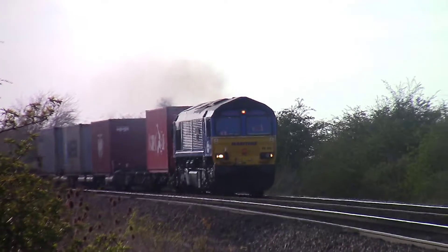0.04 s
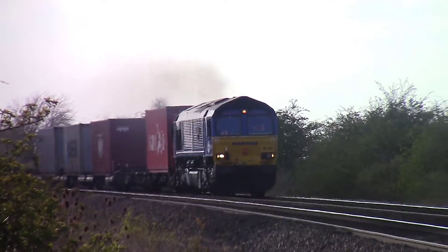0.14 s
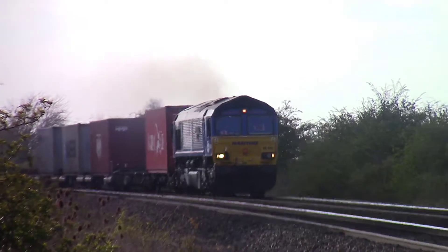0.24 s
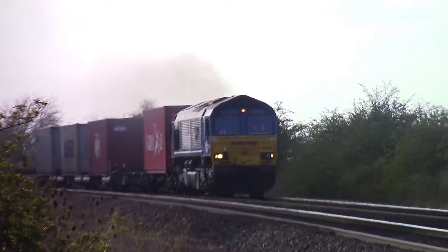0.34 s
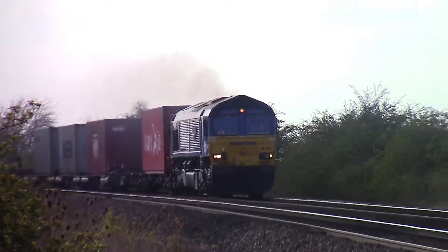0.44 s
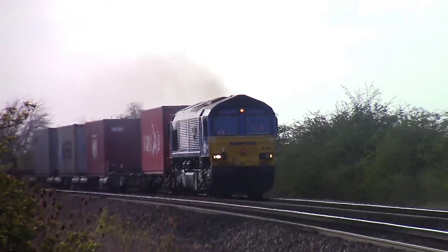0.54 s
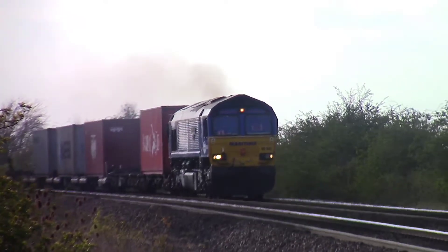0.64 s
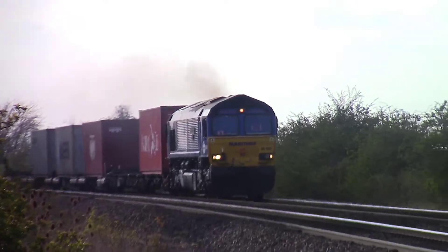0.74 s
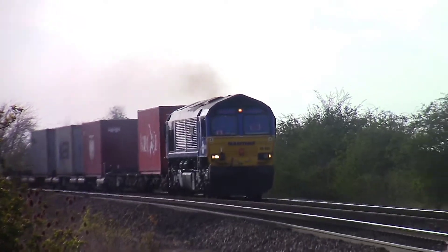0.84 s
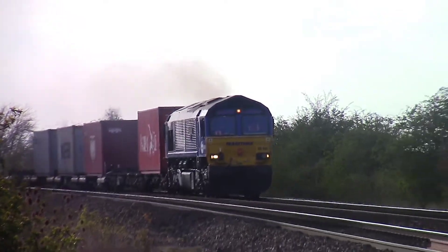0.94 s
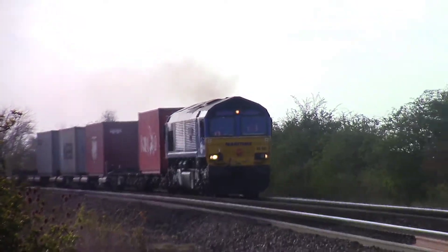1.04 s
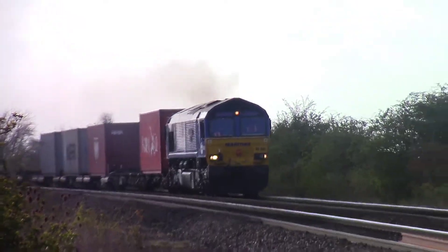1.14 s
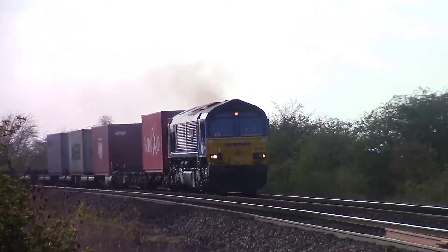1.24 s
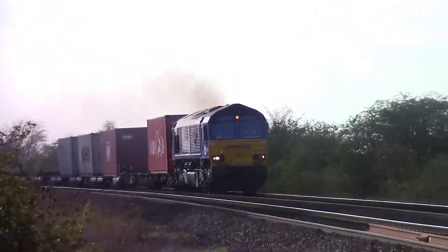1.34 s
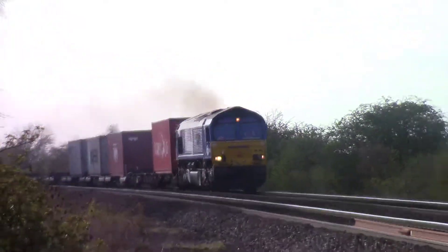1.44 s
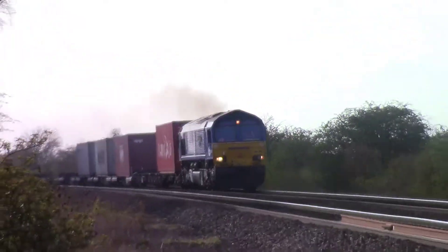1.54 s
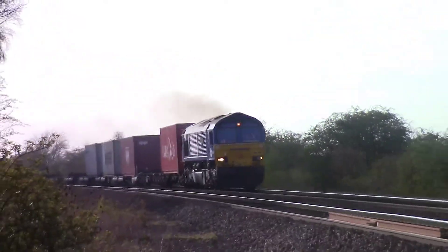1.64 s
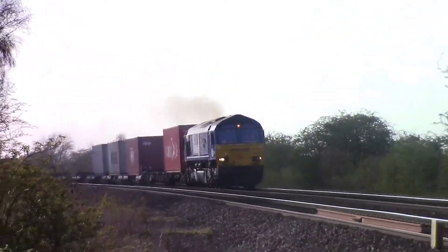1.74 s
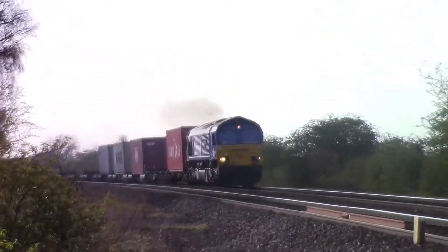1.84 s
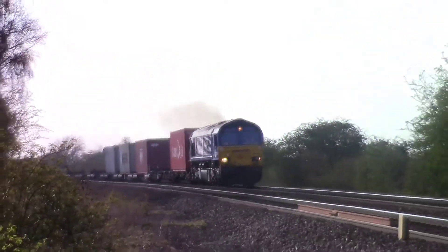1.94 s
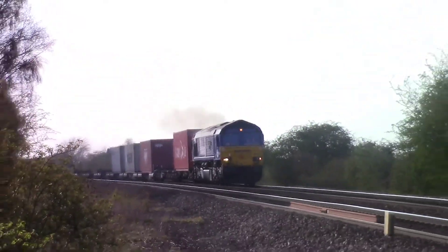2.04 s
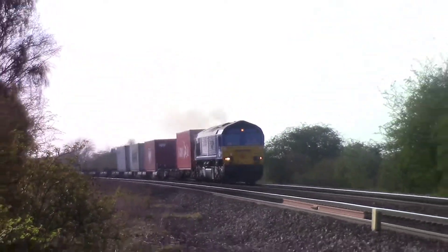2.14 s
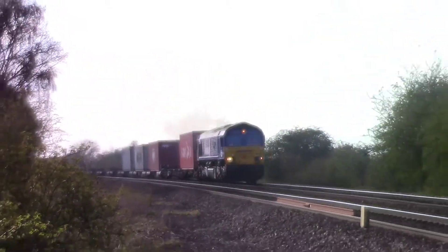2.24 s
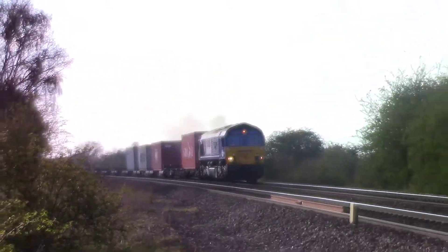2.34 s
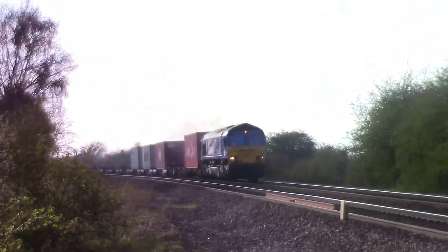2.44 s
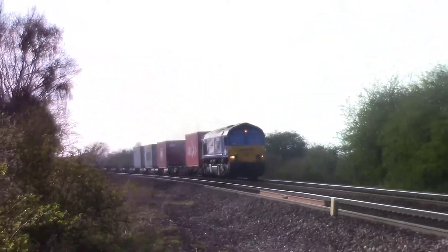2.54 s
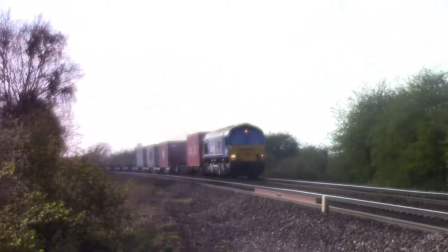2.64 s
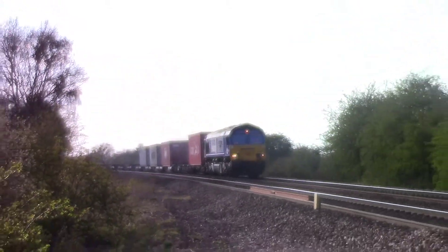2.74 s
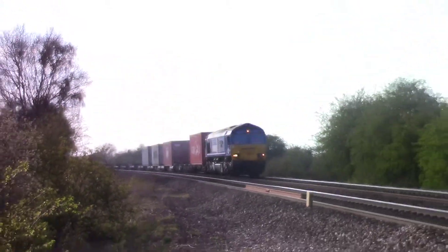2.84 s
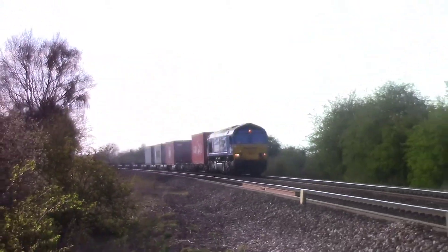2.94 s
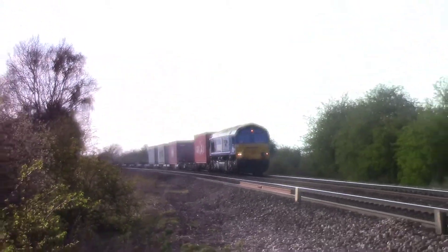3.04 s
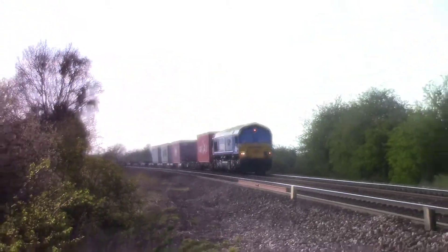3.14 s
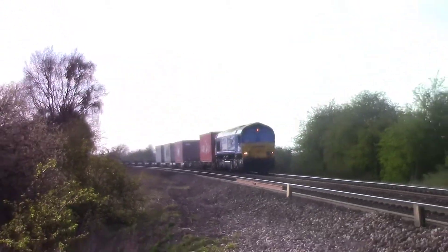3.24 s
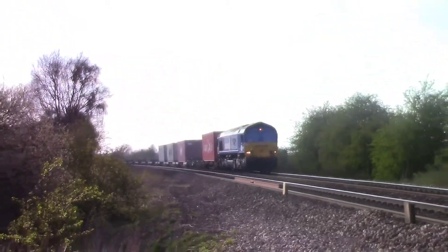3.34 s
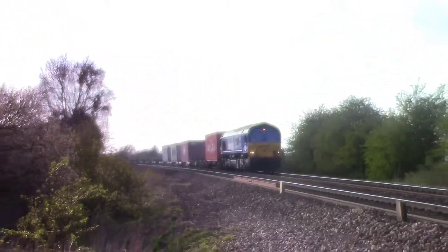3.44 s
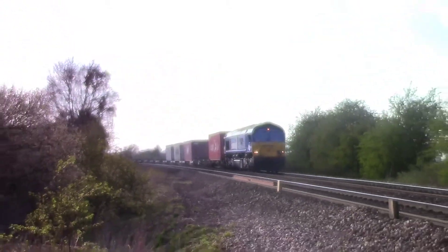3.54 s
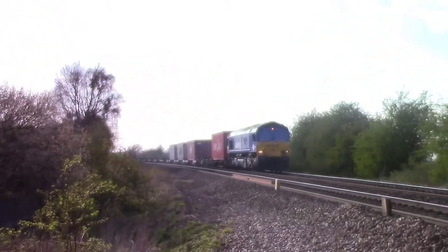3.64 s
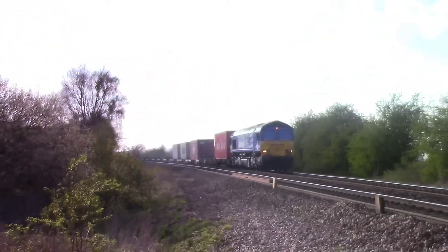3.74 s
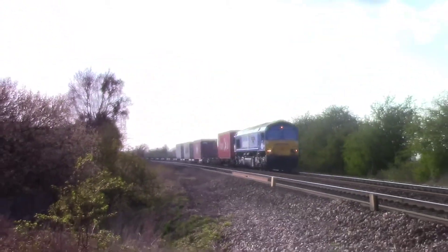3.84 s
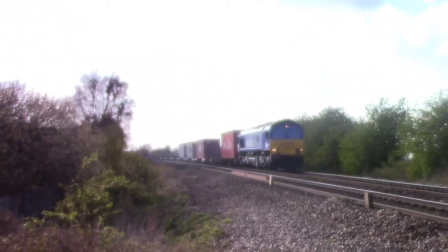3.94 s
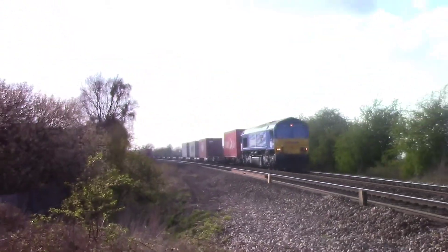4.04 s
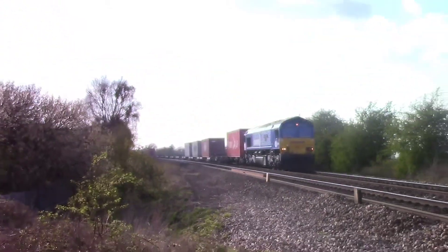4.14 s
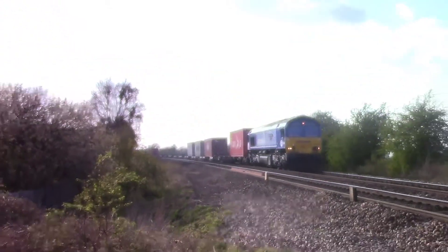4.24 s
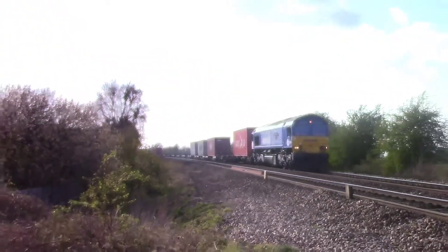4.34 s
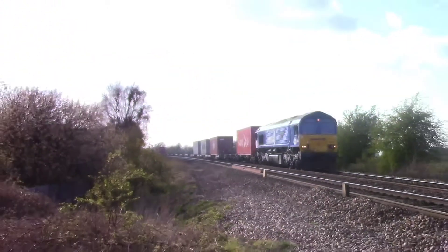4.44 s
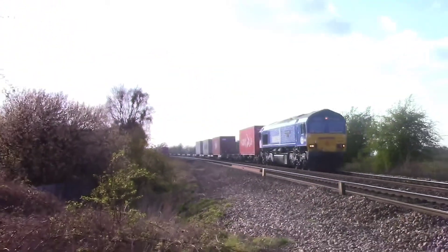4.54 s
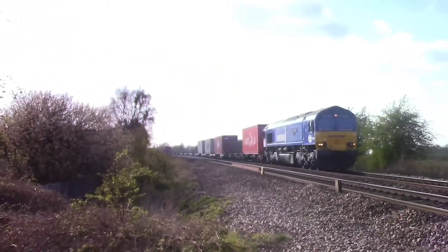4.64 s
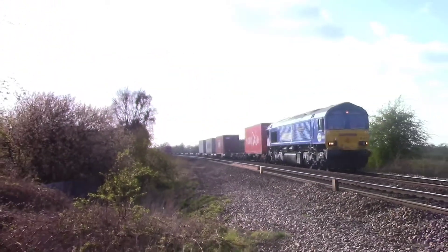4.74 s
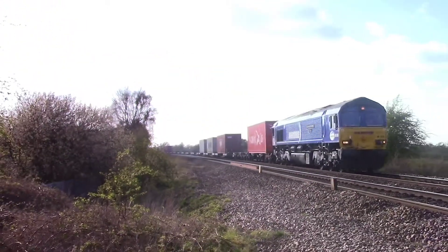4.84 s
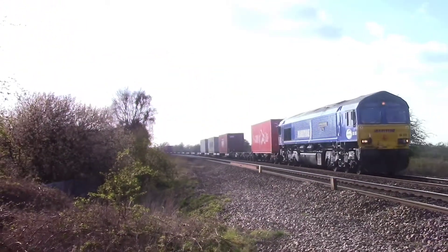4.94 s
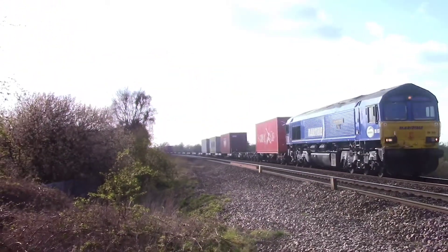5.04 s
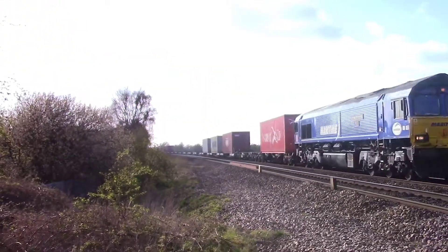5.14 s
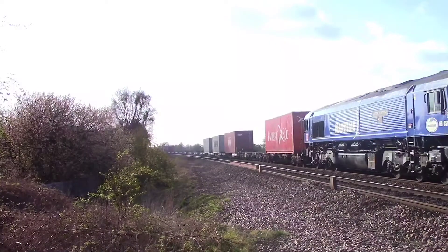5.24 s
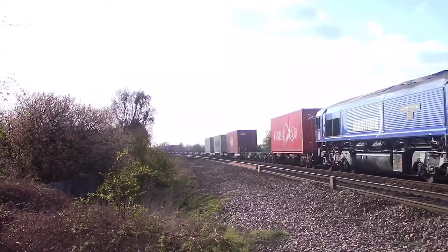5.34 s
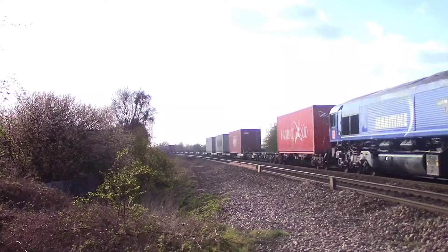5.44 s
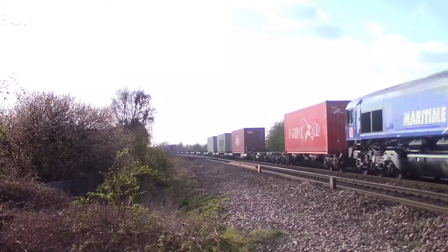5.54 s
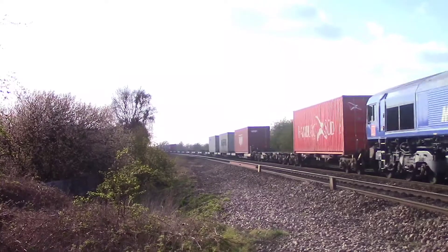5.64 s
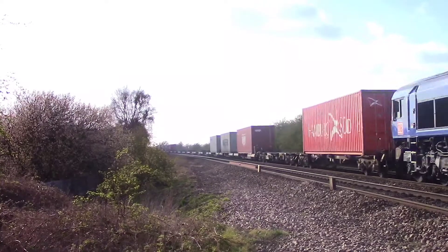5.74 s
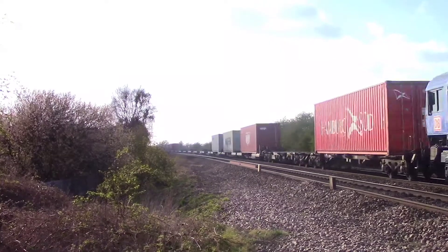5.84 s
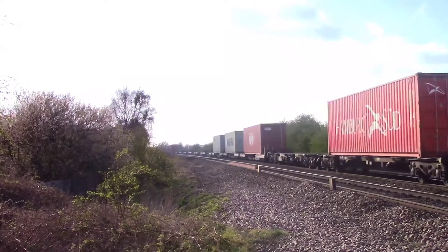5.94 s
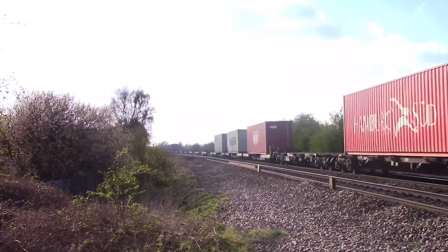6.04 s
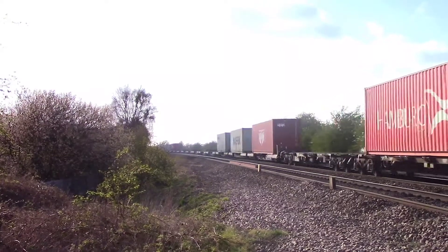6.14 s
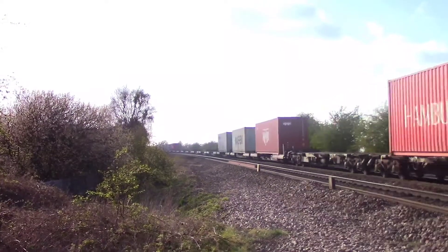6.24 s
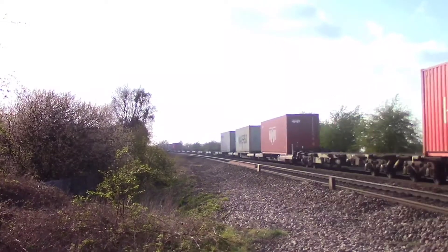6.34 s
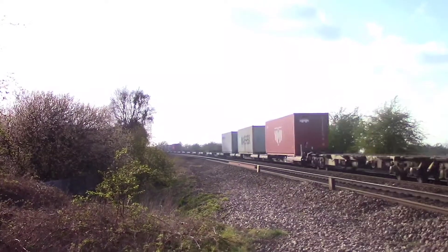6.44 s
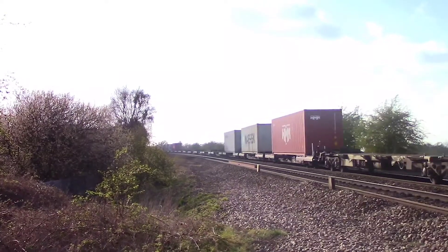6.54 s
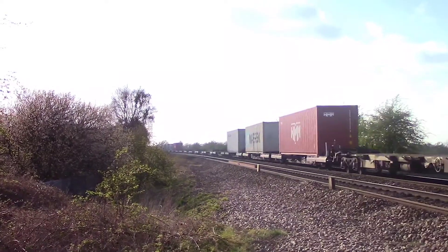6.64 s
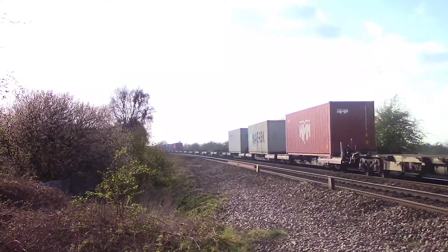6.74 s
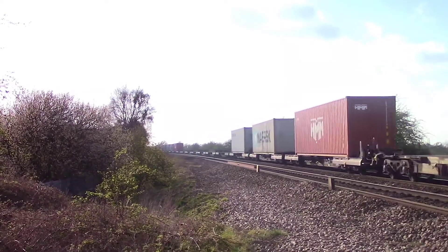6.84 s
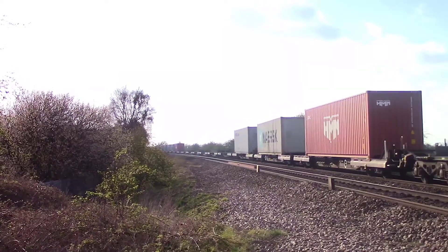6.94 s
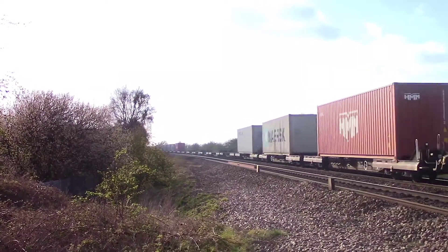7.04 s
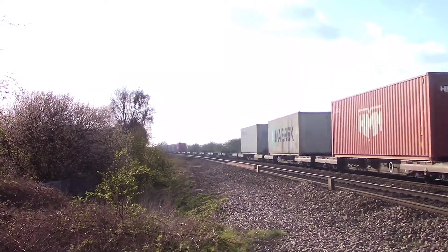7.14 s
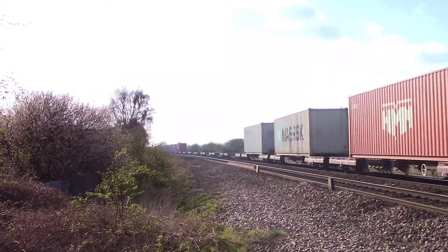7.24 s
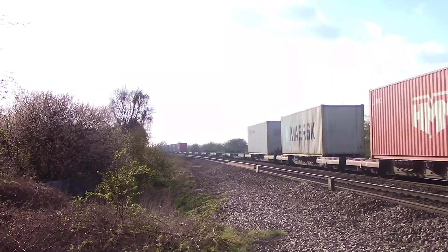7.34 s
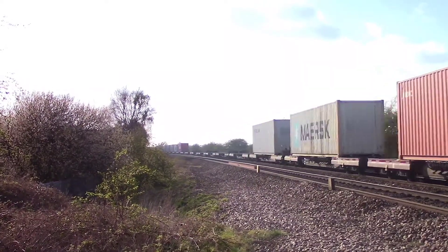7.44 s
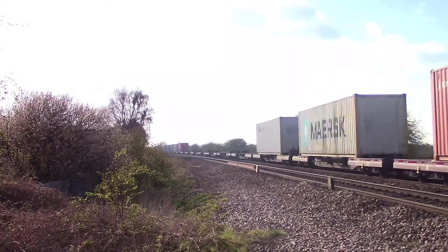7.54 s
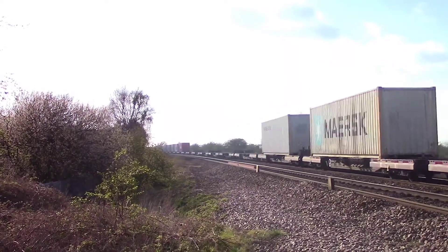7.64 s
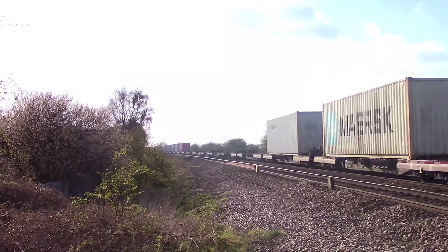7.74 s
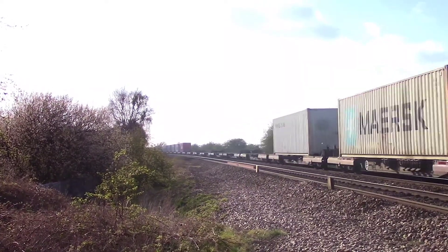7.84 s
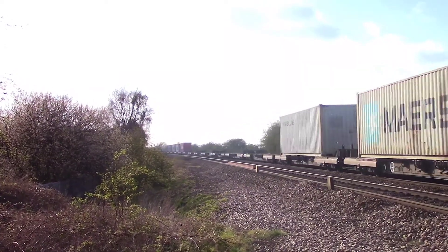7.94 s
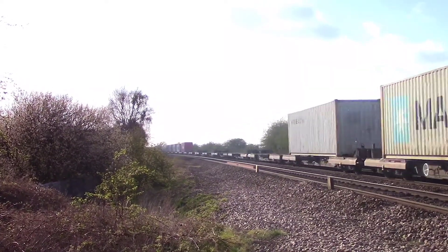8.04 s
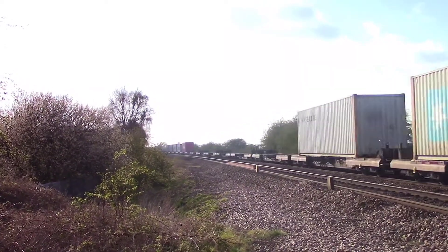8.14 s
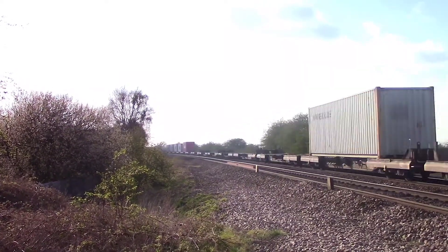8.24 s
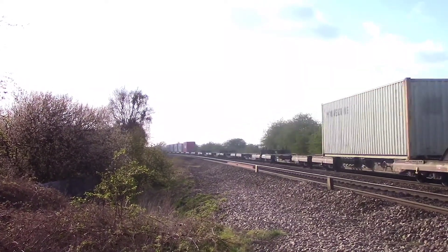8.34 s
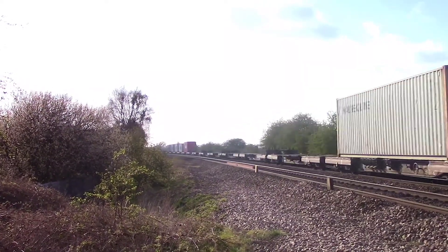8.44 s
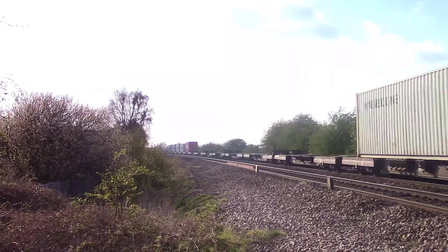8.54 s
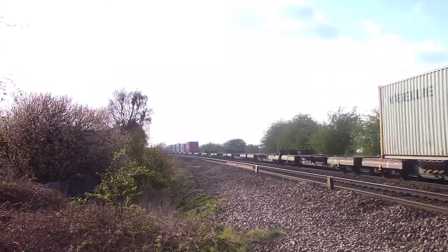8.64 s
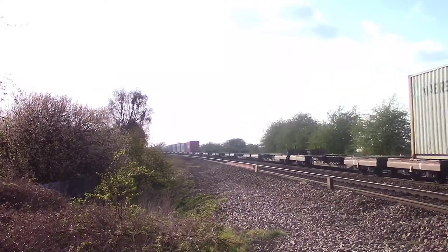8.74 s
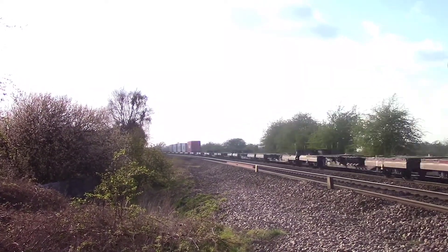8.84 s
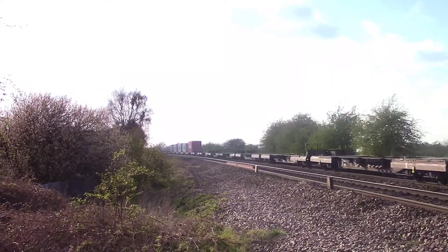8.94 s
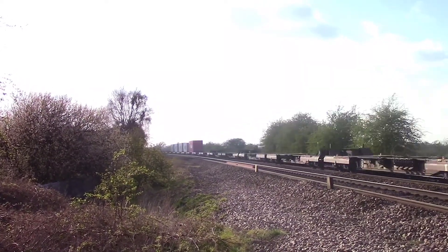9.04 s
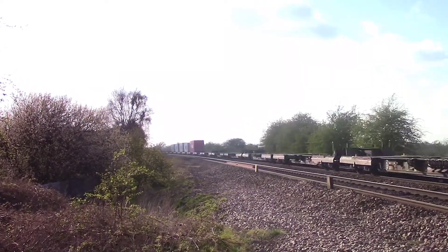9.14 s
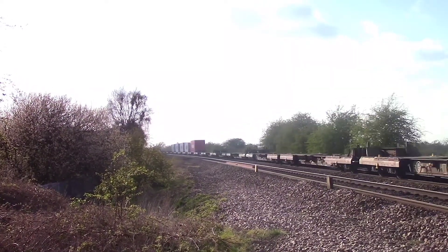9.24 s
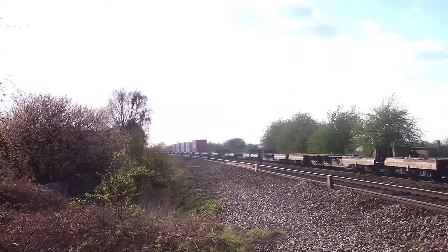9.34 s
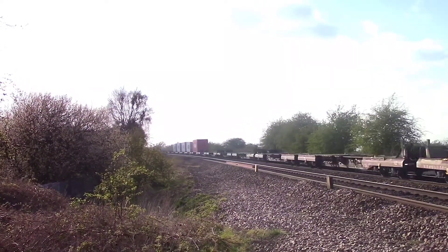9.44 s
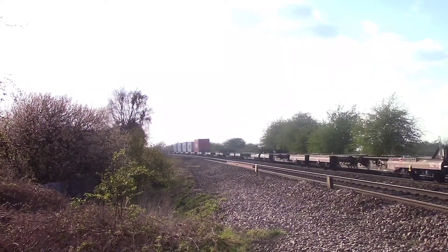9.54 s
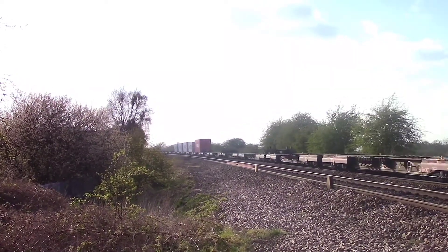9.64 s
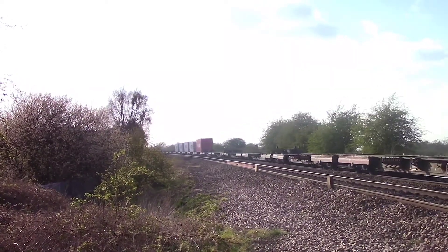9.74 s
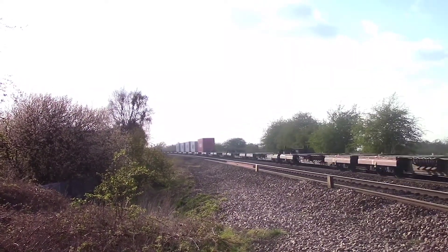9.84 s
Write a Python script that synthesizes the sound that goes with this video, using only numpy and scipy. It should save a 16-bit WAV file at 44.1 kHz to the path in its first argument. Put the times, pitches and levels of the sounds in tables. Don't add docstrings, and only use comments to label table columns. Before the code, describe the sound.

Quiet trackside with a brief bird trill and ringing rails, swelling into a loud locomotive pass, followed by rattling, hollow-booming container wagons.

```python
import sys
import numpy as np
from scipy import signal
from scipy.fft import rfft, irfft, next_fast_len
from scipy.io import wavfile
from scipy.ndimage import uniform_filter1d, minimum_filter1d, map_coordinates

SR = 44100
rng = np.random.default_rng(int(sys.argv[2]) if len(sys.argv) > 2 else 0)


def log_audio(samples):
    frames = np.atleast_2d(samples).T
    limited = np.clip(frames, -1, 1)
    pcm = np.round(limited * 32767).astype(np.int16)
    wavfile.write(sys.argv[1], SR, pcm)


def magnitude_from_level(level_db):
    exponent = np.asarray(level_db, float) / 20
    return 10 ** exponent


N = 436590
T = np.arange(N) / SR
SPEED_M_S, TRACK_M = 25.7, 6.4
FRAME = 1024


def on_log(table, hz):
    f, v = np.transpose(table)
    return np.interp(np.log(hz + 1), np.log(f), v)


def walk(size, smooth):
    x = rng.standard_normal(size)
    for axis, cells in enumerate(smooth):
        k = max(int(cells), 1)
        x = uniform_filter1d(x, k, axis=axis)
        x = uniform_filter1d(x, k, axis=axis)
    return x / x.std()


def roar(colour, bands, s, levels, patchy_db, beat_db, extra=None):
    hz, t, z = signal.stft(rng.standard_normal(N), SR, nperseg=FRAME, noverlap=3 * FRAME // 4)
    base = on_log(colour, hz)
    lift = []
    for (lo, hi), db in zip(bands, levels):
        in_band = (hz >= lo) & (hz < hi)
        share = np.sum(magnitude_from_level(2 * base[in_band])) / len(hz)
        lift.append(np.interp(t, s, db) - 10 * np.log10(share))
    centres = np.log(np.prod(bands, axis=1)) / 2
    place = np.interp(np.log(hz + 1), centres, np.arange(len(bands)))
    grid = np.meshgrid(place, np.arange(len(t)), indexing="ij")
    db = base[:, None] + map_coordinates(np.array(lift), grid, order=1)
    db = db + patchy_db * walk(z.shape, (3, 8))
    db = db + beat_db * walk(z.shape, (110, 4)) * np.clip(hz / 5000, 0, 1)[:, None]
    if extra:
        db = db + extra(hz[:, None], t)
    return signal.istft(z * magnitude_from_level(db), SR, nperseg=FRAME, noverlap=3 * FRAME // 4)[1][:N]


def hump(s, centre_hz, db, width_hz):
    def lift(hz, t):
        offset = (hz - np.interp(t, s, centre_hz)) / width_hz
        return np.interp(t, s, db) / (1 + offset ** 2)
    return lift


def sing(hz, db, width_hz, steady):
    k = max(int(.5 * SR / width_hz), 1)
    wander = walk(N, (k,)) + 1j * walk(N, (k,))
    steady = np.clip(steady, 0, 1)
    size = np.sqrt(2 * steady) + np.sqrt(1 - steady) * wander
    cycles = rng.random() + np.cumsum(hz + 0 * T) / SR
    return magnitude_from_level(db) * np.real(size * np.exp(2j * np.pi * cycles))


def add(out, s, x):
    i = int(s * SR)
    out[i:i + len(x)] += x[:len(out) - i]


def chirps(rows):
    out = np.zeros(N)
    for s, length, hz0, hz1, db in rows:
        n = int(length * SR)
        cycles = np.cumsum(np.linspace(hz0, hz1, n)) / SR
        add(out, s, magnitude_from_level(db) * np.hanning(n) * np.sin(2 * np.pi * cycles))
    return out


def passing(hz, at_s, swing=SPEED_M_S / 343, span_s=TRACK_M / SPEED_M_S):
    along = (T - at_s) / span_s
    return hz * (1 - swing * along / np.hypot(1, along))


def swell(start_s, end_s, db, reach_s, fade_s):
    screen_db_s = 4
    early = np.maximum(start_s - T, 0)
    late = np.maximum(T - end_s, 0)
    lead_in = screen_db_s * early ** 2 + 20 * np.log10(1 + early / reach_s)
    return db - lead_in - 40 * np.log10(1 + late / fade_s)


# time in seconds, level in dB.
APPROACH = [(0, -49), (.5, -48), (1.5, -42), (2.6, -37), (3.3, -32), (4, -28), (4.65, -23.5), (4.8, -22.5),
            (5.0, -19.5), (5.25, -17), (5.44, -12.5), (5.75, -13), (5.95, -15), (6.1, -14), (6.27, -13.5),
            (6.45, -17), (6.7, -10)]


def near():
    abreast_db = -12.5
    return np.interp(T, *np.transpose(APPROACH)) - abreast_db


# full from in seconds, until in seconds, level in dB.
GUSTS = [
    (5.2, 5.35, -38.5),
    (7.76, 7.983, -41.5),
    (9.0, 9.097, -40),
    (9.35, 9.55, -42),
]


def wind():
    calm_db, freshen_db_s, breeze_db = -59, 1, -52.5
    reach_s, patchy_db = .07, 2.5
    breeze = np.minimum(calm_db + freshen_db_s * T, breeze_db)
    gusts = [swell(*gust, reach_s, 2 * reach_s) for gust in GUSTS]
    db = np.max([breeze] + gusts, axis=0)
    colour = [(20, -7), (45, 6.5), (70, -6), (140, -44.5)]  # (Hz, dB per Hz)
    return roar(colour, [(40, 90)], T, [db + 1.5], patchy_db, 0)


# frequency in Hz, density in dB per Hz.
WHIRR_COLOUR = [(2000, -26), (3500, -19), (4700, -10.5), (5900, -22), (6900, 4.5), (8500, -12), (11000, -6),
                (12400, -8.5), (13400, -1), (14400, -3), (15400, -5)]
# time in seconds, level in dB.
WHIRR_LEVEL = [(0, -78.5), (1.4, -72), (3, -69.5), (5, -63), (5.6, -69)]
# frequency in Hz, width in Hz, level in dB.
WHIRR_LINES = [(6690, 130, -69), (7600, 120, -89), (10230, 60, -87), (11700, 80, -84)]
# time in seconds, peak in dB.
TICKS = [
    (1.36, -52),
    (1.425, -50),
]


def camcorder():
    s, db = np.transpose(WHIRR_LEVEL)
    mid, side = (roar(WHIRR_COLOUR, [(13200, 15000)], s, [db], 1.2, .8) for _ in range(2))
    mid = mid + sum(sing(hz, line_db, width, .02) for hz, width, line_db in WHIRR_LINES)
    for s, db in TICKS:
        tick = np.diff(rng.standard_normal(302), 2) / 5
        add(mid, s, magnitude_from_level(db) * tick * np.exp(-T[:300] / .002))
    return mid + magnitude_from_level(-4) * side * np.array([[1], [-1]])


# start in seconds, length in seconds, start and end pitch in Hz, peak in dB.
BIRD_NOTES = [(.2, .04, 5400, 5100, -67), (1.095, .02, 5750, 5950, -60), (1.128, 0.021, 3800, 4700, -57),
              (1.244, 0.023, 4290, 5400, -54), (1.302, .022, 3200, 4000, -58), (1.45, .04, 5120, 5130, -52),
              (1.472, 0.032, 5130, 5330, -58), (1.505, .025, 5100, 5300, -62),
              (1.601, 0.02, 3480, 4700, -53), (1.626, .02, 4800, 5900, -50), (1.636, .016, 5700, 6100, -50)]
# start in seconds, peak in dB.
TRILL = [(1.6814, -49), (1.7434, -50), (1.8064, -48), (1.8746, -53), (1.9324, -54), (1.9964, -58),
         (2.0614, -53), (2.1244, -54), (2.1904, -55), (2.2643, -59)]


def bird():
    up = [(s, .02, 4600, 5300, db) for s, db in TRILL]
    down = [(s + .016, .019, 4700, 3000, db + 2.5) for s, db in TRILL]
    return chirps(BIRD_NOTES + up + down)


# start in seconds, peak in dB, pitch in Hz.
KNOCKS = [(6.919, -2, 830), (7.001, 2, 754), (7.083, 1.5, 910), (7.149, 1, 784), (7.23, 2.5, 921),
          (7.259, 0, 894), (7.339, -7, 810), (7.398, 2, 704), (7.483, -20, 937), (7.521, 4, 633),
          (7.669, 2, 864), (7.851, -0.5, 641), (8.214, 3, 501), (8.244, 0, 511), (8.603, -18, 545),
          (8.834, 3.5, 773), (8.995, -12, 503), (9.301, -1.5, 569), (9.382, -10, 668), (9.793, 1, 496)]


def knocks():
    out, t = np.zeros(N), T[:2500]
    envelope = (1 - np.exp(-t / 0.00084)) * np.exp(-t / 0.0099)
    for s, db, hz in KNOCKS:
        burst = rng.standard_normal(len(t)) * envelope
        sos = signal.butter(2, [hz / 1.35, hz * 1.35], "bandpass", fs=SR, output="sos")
        ring = signal.sosfilt(sos, burst)
        add(out, s, magnitude_from_level(db - 5) * ring / np.abs(ring).max())
    return out


# start in seconds, length in seconds, start and end pitch in Hz, peak in dB.
RINGS = [(4.85, .7, 436, 430, -26), (5.36, .18, 2975, 2930, -26), (5.746, .014, 7600, 7600, -25),
         (5.762, .012, 7700, 7650, -30), (7.0, .03, 4550, 4520, -29), (7.07, .05, 4280, 4230, -28),
         (7.08, .13, 305, 295, -10), (7.14, .035, 4550, 4510, -29), (7.285, .08, 3360, 3320, -19),
         (7.305, .045, 4060, 4050, -25), (7.41, .04, 4070, 4050, -29), (7.415, .035, 4950, 4950, -32),
         (8.11, .05, 720, 600, -11), (5.55, .3, 260, 256, -17), (5.96, .24, 272, 292, -12),
         (6.79, .14, 2925, 2865, -27)]


def metal_rings():
    return chirps(RINGS)


# full from in seconds, until in seconds, pitch in Hz, level in dB.
WHEELS = [
    [(7.62, 8.45, 1931, -23.5), (8.65, 9.3, 1983, -22.5), (9.6, 9.9, 1986, -21.5)],
    [(7.5, 8, 2543, -25), (8.4, 8.54, 2486, -27), (8.66, 8.75, 2602, -23), (9.59, 9.75, 2575, -21.5)],
]


def wagon_wheels():
    sag_hz_s, reach_s, width_hz = 70.44, .08, 150
    out = 0
    for sets in WHEELS:
        dbs = np.array([swell(s0, s1, db, reach_s, 2 * reach_s) for s0, s1, _, db in sets])
        s0, _, hz, _ = np.array(sets)[dbs.argmax(axis=0)].T
        sagging_hz = hz - sag_hz_s * np.clip(T - s0, -1, 1)
        out = out + sing(sagging_hz, dbs.max(axis=0) - 5.5, width_hz, 0.06)
    return out


# multiple of the pitch, level in dB, level in the flare in dB.
SQUEAL = [(3, -29.5, -22), (4, -34.5, -23.5), (5, -43, -30.5)]


def wheel_squeal():
    heard_s, flare_s = (6.72, 7.73), (7.18, 7.34)
    hz = passing(698, 7.0, swing=.105, span_s=0.32)
    out = 0
    for k, db, flare_db in SQUEAL:
        held = swell(*heard_s, db, .01, .02)
        flare = swell(*flare_s, flare_db, .06, 0.065)
        out = out + sing(k * hz, np.maximum(held, flare), 20 * k, 0.045)
    return out


# pitch in Hz, wheels arrive in seconds, level abreast in dB.
RAILS = [
    (1614, 5.24, -19.5),
    (1648, 6.6, -19.5),
]
# multiple of the pitch, level in dB, width in Hz.
RAIL_TONES = [(.5, -13, 42), (.515, -10.5, 11.5), (.97, -10, 22), (1, -1, 19.5), (1.04, -13.5, 60),
              (1.46, -15.5, 60), (1.57, -15, 27), (2.02, -21.5, 140), (2.95, -50, 130)]
# centre in seconds, level change in dB.
RAIL_SPELLS = [
    [(.6, 2), (1.3, 5), (2, -3), (4, 4.5), (4.7, -11)],
    [(.6, 0), (1.3, 0), (2.4, 4.5), (4.6, 4.5)],
]


def singing_rails():
    steep, top_db, spell_s = 0.92, -27.5, 0.18
    out = 0
    for (hz, arrive_s, db), spells in zip(RAILS, RAIL_SPELLS):
        level = np.minimum(db + steep * near(), top_db)
        level = level + sum(g * np.exp(-((T - s) / spell_s) ** 2) for s, g in spells)
        tones = sum(sing(k * hz, level + g, width, 0.48) for k, g, width in RAIL_TONES)
        out = out + np.clip((arrive_s - T) / 0.43, 0, 1) * tones
    return out


# passes in seconds, mesh frequency in Hz, fade in seconds.
BOGIES = [
    (5.93, 820, .12),
    (6.43, 807.6, 0.059),
]
# multiple, full from in seconds, until in seconds, level in dB, lead-in reach in seconds.
MESH = [
    [(1, 5.6, 5.84, -14.5, 0.037), (1, 5.92, 6.3, -20, .03), (2, 5.47, 6.1, -12, 0.088),
     (3, 5.41, 5.7, -18.5, 0.15), (3, 5.84, 6.22, -21.5, .03), (4, 5.3, 5.5, -27.5, 0.13)],
    [(1, 5.42, 6.5, -25, .1), (2, 6.18, 6.45, -13.5, .1), (2, 6.5, 6.72, -18, .03),
     (3, 6.36, 6.54, -15, 0.12), (3, 6.58, 6.68, -20.5, .03)],
]


def axle_gears():
    spread, lag_s = .012, .07
    out = 0
    for (s, hz, fade_s), partials in zip(BOGIES, MESH):
        for axle, late_s in ((1 - spread, 0), (1, lag_s)):
            for k, s0, s1, db, reach_s in partials:
                level = swell(s0, s1, db - 4.0, reach_s, fade_s)
                out = out + sing(passing(k * axle * hz, s + late_s), level, 16 * k, 0.15)
    return out


# time in seconds, level in dB.
RATTLE = [(6.2, -35), (6.56, -40), (6.84, -38), (7.12, -34), (7.32, -34.5), (7.5, -37), (7.85, -37.5),
          (8.0, -39.5), (8.14, -37.5), (8.5, -40), (8.7, -38), (9.0, -37.5), (9.2, -38), (9.31, -33.5),
          (9.38, -34), (9.46, -31.5), (9.56, -36.5), (9.7, -32.5)]
# frequency in Hz, density in dB per Hz.
WAGON_COLOUR = [(25, -53), (60, -46), (100, -24), (214, -4.5), (376, -3), (590, -8), (890, -9.5),
                (1360, -19), (1640, -20.5), (2000, -20), (2600, -25.5), (3500, -30), (7000, -42)]
WAGON_BANDS = [(200, 550), (650, 1300), (1700, 3000), (4500, 10000)]
# time in seconds, share from 0 to 1.
EMPTY = [(6.2, 0), (7.6, 0.22), (8.4, 0.45), (9.1, 0.86), (9.9, 0.99)]
# level in dB, slope in dB per dB of rattle, gain when empty in dB.
WAGON_SHARES = [(-17, 0.38, 5.5), (-19.5, 0.4, 1.9), (-24.5, 0.65, 1.4), (-36.5, 1.34, -0.1)]


def rolling_wagons():
    rattle_db, boom_hz, rise_hz, wander_hz, boom_lift_db = -36.5, 364, 28, 30, 8.5
    rattle = np.interp(T, *np.transpose(RATTLE)) - rattle_db
    empty = np.interp(T, *np.transpose(EMPTY))
    levels = [db + steep * rattle + hollow_db * empty for db, steep, hollow_db in WAGON_SHARES]
    centre_hz = boom_hz + rise_hz * empty + wander_hz * walk(N, (SR / 8,))
    boom = hump(T, centre_hz, boom_lift_db * empty, 69)
    return roar(WAGON_COLOUR, WAGON_BANDS, T, levels, 1.45, 1.2, extra=boom)


# frequency in Hz, density in dB per Hz.
LOCO_COLOUR = [(25, -59), (70, -22), (140, -10.5), (260, -8.5), (400, -12), (560, -5), (820, -5),
               (1150, -9.5), (1400, -10), (1640, -1.5), (2040, -16), (2400, -8.5), (3100, -19),
               (7000, -40.5)]
LOCO_BANDS = [(170, 400), (450, 1300), (1900, 2250), (5300, 9500)]
# dB abreast, dB per dB of approach, dB from the far wagons.
LOCO_SHARES = [(-17.5, 1.36, -61), (-17, .93, -62), (-29, 0.93, -64), (-32.5, 1.36, -84)]
# time in seconds, centre in Hz, lift in dB.
GROUND_ECHO = [(0, 180, 2.5), (4.799, 207, -3.5), (5.4, 260, 1.5), (6.1, 316, 12), (6.6, 350, 15.5)]


def rolling_locomotive():
    levels = []
    for db, steep, far_db in LOCO_SHARES:
        power = magnitude_from_level(2 * (db + steep * near())) + magnitude_from_level(2 * far_db)
        levels.append(10 * np.log10(power))
    echo = hump(*np.transpose(GROUND_ECHO), 51.0)
    return roar(LOCO_COLOUR, LOCO_BANDS, T, levels, 1.28, 0.64, extra=echo)


# start in seconds, end in seconds.
HANDOVER = (6.04, 6.66)


def rolling():
    start_s, end_s = HANDOVER
    turn = np.pi / 2 * np.clip((T - start_s) / (end_s - start_s), 0, 1)
    return np.cos(turn) * rolling_locomotive() + np.sin(turn) * rolling_wagons()


# multiple of the crank rate, level in dB.
CRANK_ORDERS = [(3, -23), (4, -19.5), (5, -12.5), (6, -18), (7, -12.5), (8, -3), (9, -3.5), (10, -20),
                (11, -12), (12, -22), (16, -14.5)]


def diesel():
    crank_hz, passes_s, engine_spread_m = 15.62, 6.1, 17.55
    level_db, steep, loudest_s, fall_db_s = -23, 1.05, 5.3, 9
    hz = passing(crank_hz, passes_s, span_s=engine_spread_m / SPEED_M_S)
    db = level_db + steep * np.interp(np.minimum(T, loudest_s), T, near())
    db = db - fall_db_s * np.maximum(T - loudest_s, 0)
    return sum(sing(k * hz, db + g, 2.6, .93) for k, g in CRANK_ORDERS)


# frequency in Hz, left minus right in dB.
LEAN = [(60, 0), (250, -.1), (700, -.3), (1400, -.7), (2800, -1.4), (5500, -2.6), (9500, -2.2), (13000, .3)]
# frequency in Hz, level in dB.
SCATTER = [(60, -26), (180, -30), (350, -27), (700, -23), (1400, -20), (2800, -19), (5500, -16),
           (9500, -11), (13500, -9)]


def scene():
    direct = wind() + bird() + knocks() + metal_rings() + wagon_wheels() + wheel_squeal()
    direct = direct + singing_rails() + axle_gears() + rolling() + diesel()
    size = next_fast_len(N + SR)
    hz = np.arange(size // 2 + 1) * SR / size
    tail = rng.standard_normal(SR // 2) * np.exp(-T[:SR // 2] / 0.26)
    tail = tail / np.sqrt(np.sum(tail ** 2))
    spectrum = rfft(direct, size)
    scattered = spectrum * rfft(tail, size) * magnitude_from_level(on_log(SCATTER, hz))
    lean = magnitude_from_level(on_log(LEAN, hz) / 2)
    return irfft(np.array([spectrum * lean + scattered, spectrum / lean - scattered]), size)[:, :N]


def top_cut(x):
    return signal.sosfilt(signal.butter(12, 15400, fs=SR, output="sos"), x)


# frequency in Hz, gain in dB.
MIC = [(20, -13), (45, 0), (8000, 0), (9800, -7.5), (10800, -15.5), (13000, -21), (15500, -31)]


def record(dry):
    size = next_fast_len(N + SR)
    hz = np.arange(size // 2 + 1) * SR / size
    x = irfft(rfft(dry, size) * magnitude_from_level(on_log(MIC, hz)), size)[:, :N]
    x = x + camcorder()
    room_left = np.minimum(1, .96 / (np.abs(x).max(axis=0) + 1e-9))
    x = x * uniform_filter1d(minimum_filter1d(room_left, size=441), size=441)
    return top_cut(x)


dry = scene()
out = record(dry)
log_audio(out)
```